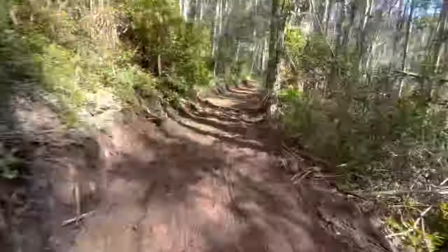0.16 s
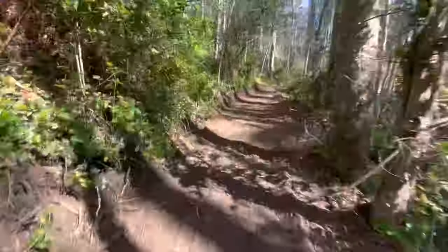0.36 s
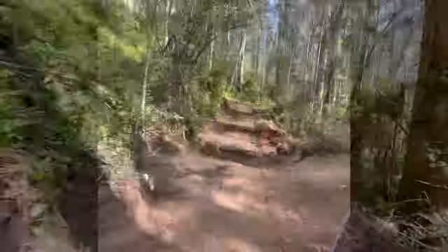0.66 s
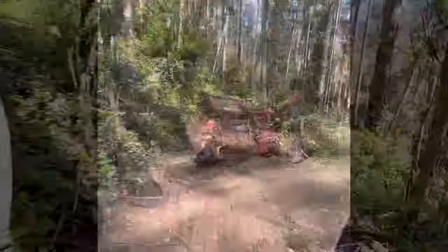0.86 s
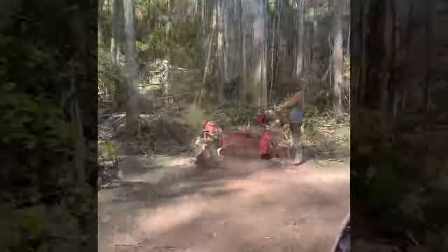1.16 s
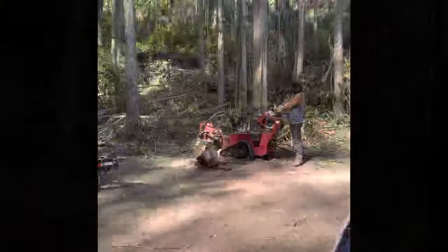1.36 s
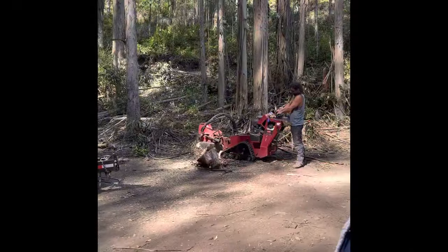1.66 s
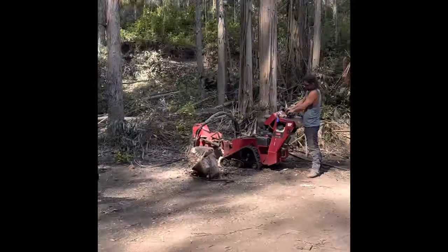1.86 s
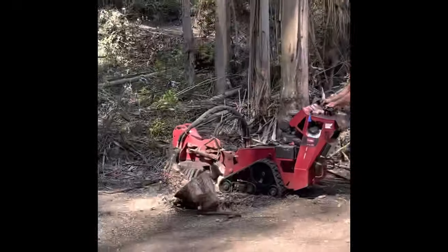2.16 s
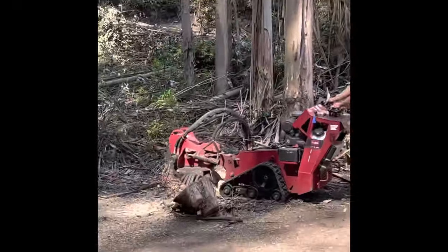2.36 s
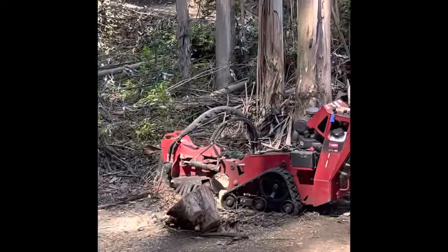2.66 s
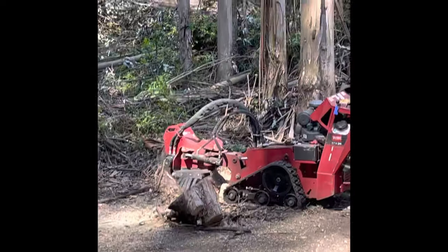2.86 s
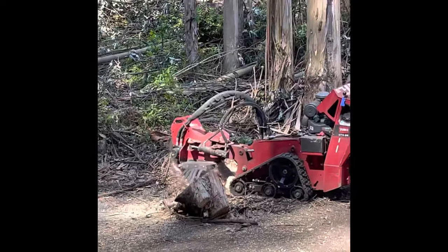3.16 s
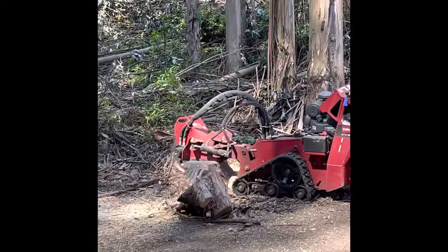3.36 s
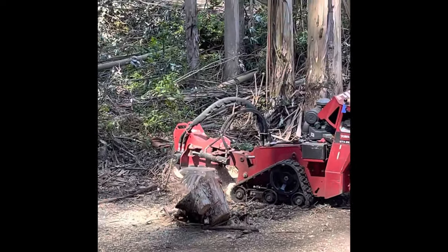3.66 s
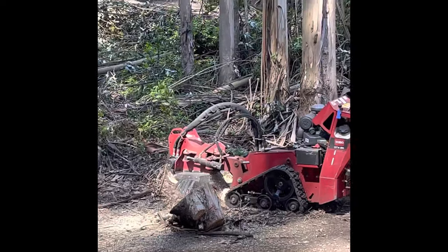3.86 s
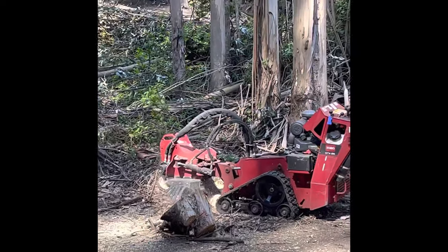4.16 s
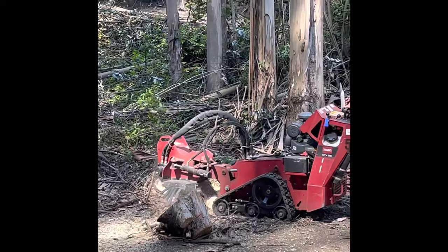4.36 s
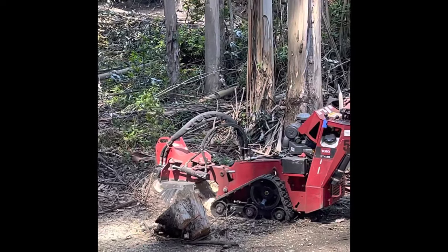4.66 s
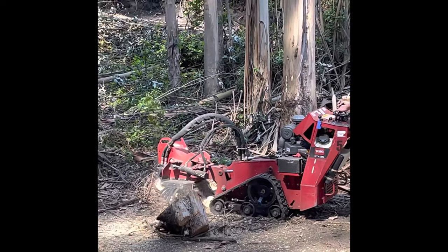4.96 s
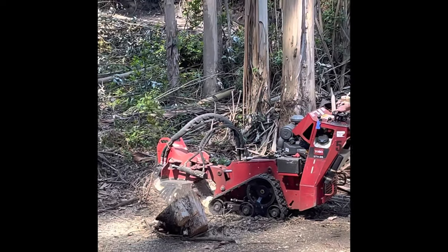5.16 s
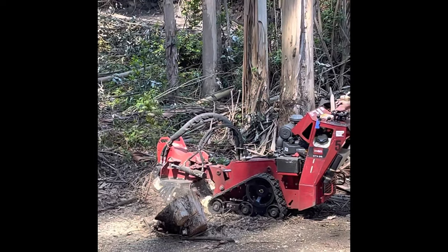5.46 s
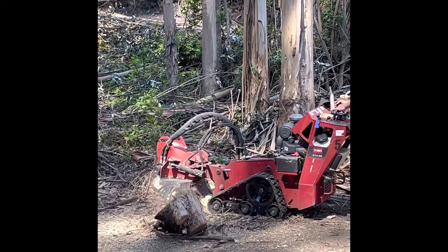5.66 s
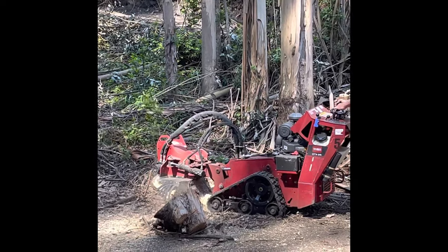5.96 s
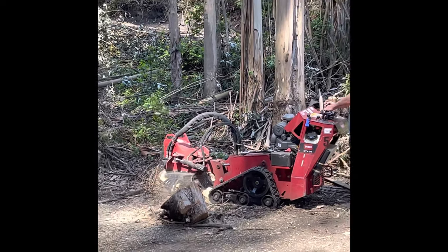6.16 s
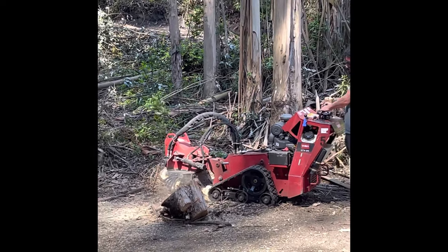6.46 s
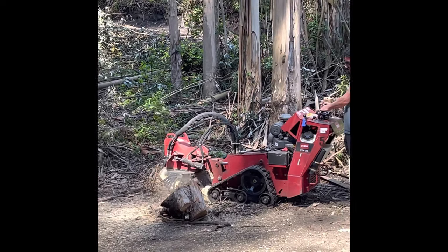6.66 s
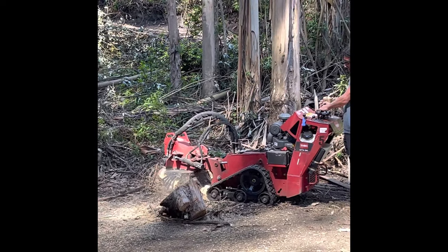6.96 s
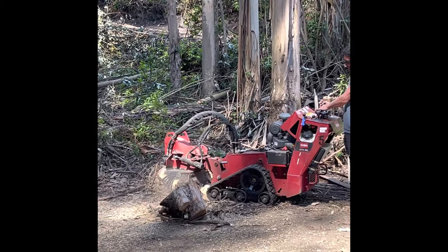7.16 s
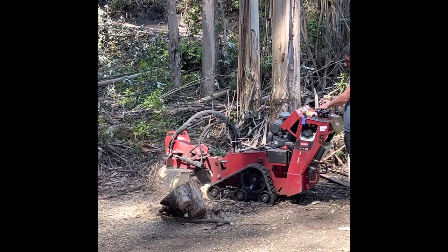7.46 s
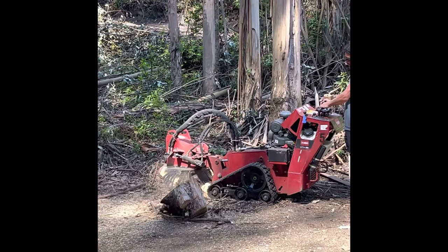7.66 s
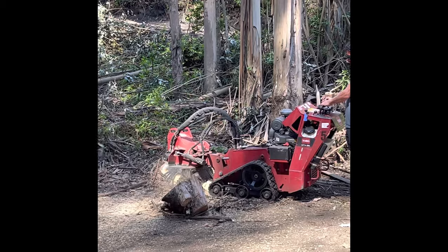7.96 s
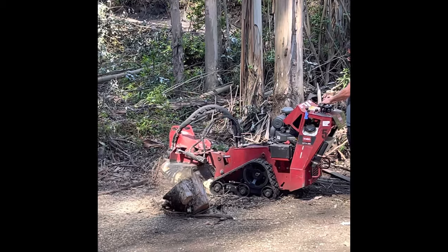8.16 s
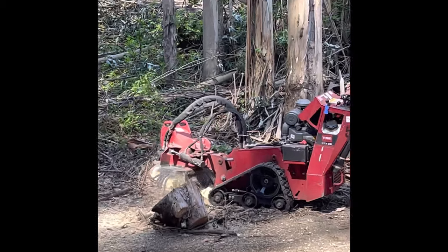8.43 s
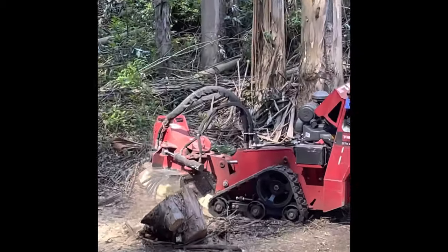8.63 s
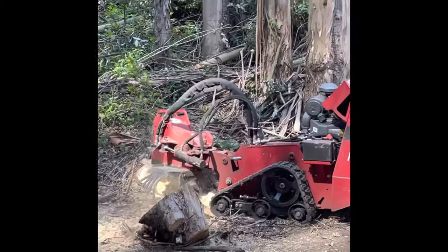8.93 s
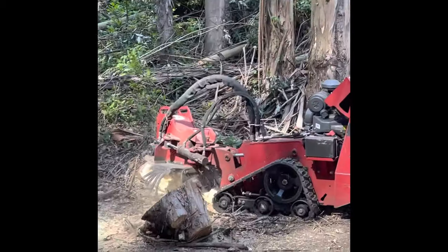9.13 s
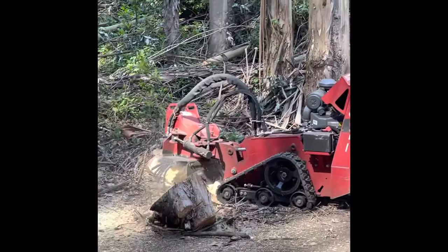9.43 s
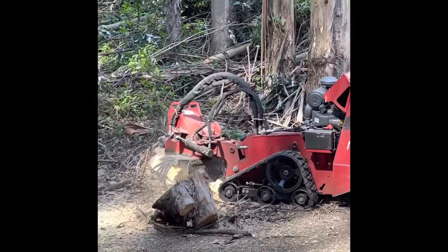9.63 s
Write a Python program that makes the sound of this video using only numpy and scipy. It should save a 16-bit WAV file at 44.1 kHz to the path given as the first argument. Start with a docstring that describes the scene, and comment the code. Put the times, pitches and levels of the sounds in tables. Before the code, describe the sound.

A petrol stump grinder fades in from about 0.4 to 1.5 seconds, a few metres from a phone in a forest with a short, dull echo. Its engine runs fast and rises slightly, with a booming exhaust, valve clatter, buzzing panels and a pump whine. At about 2.7 seconds the cutting wheel meets the stump and rapid, rough grinding begins. The deepest bite comes between 3 and 3.5 seconds, with heavy knocks, thuds and tearing fibres; the engine drops in pitch and the whine dies away. Grinding continues with a low woody groan, hollow ringing, a steely ring and irregular hard knocks, while the engine wavers, dipping noticeably near 6.9 and 8.6 seconds. From about 8.3 to 9.5 seconds the bites come thick and sharp, with cracking chips and metallic clangs. The machine is still grinding at the end, near 10 seconds.

```python
"""Stump grinder on a forest road

A two-cylinder petrol engine booms, clatters and whines a few metres from a phone; the sound fades in.
One crankshaft drives the exhaust, valves, pump and cutter wheel, so they all slow as the wheel digs in.
The wheel's teeth knock on the stump, tear its fibres and now and then bite hard."""
import sys
import numpy as np
from scipy import signal
from scipy.fft import rfft, irfft, next_fast_len
from scipy.io import wavfile
from scipy.ndimage import uniform_filter1d

SR = 44100
rng = np.random.default_rng(int(sys.argv[2]) if len(sys.argv) > 2 else 0)


def to_wav(sig):
    """Store sig (one row per channel, or 1-D mono) as 16-bit WAV at the path in sys.argv[1].

    Samples outside -1..1 are clipped; the rate is SR.
    """
    pcm = np.clip(np.atleast_2d(sig), -1, 1) * 32767
    pcm = np.round(pcm).astype(np.int16)
    wavfile.write(sys.argv[1], SR, pcm.T)  # frames by channels


N = 431738
T = np.arange(N) / SR

# the exhaust's main note, five times the engine's cycle rate: (time [s], pitch [Hz])
ENGINE_NOTE = [(.52, 142), (.75, 139), (1.0, 141.6), (1.13, 142.1), (1.42, 145.2), (2.8, 145),
               (3.42, 135.2), (4.13, 134.5), (4.32, 136.4), (4.55, 134.9), (4.72, 135.9), (4.88, 133.9),
               (5.06, 135.4), (5.63, 134), (5.8, 135.9), (6.05, 136.3), (6.53, 134.3), (6.72, 136.7),
               (6.88, 131.2), (7.25, 134), (7.5, 137.1), (7.76, 133.5), (8.0, 136.5), (8.22, 134.9),
               (8.47, 137.3), (8.59, 132.4), (8.72, 132.6), (8.87, 136.5), (9.15, 134.5), (9.37, 136.7),
               (9.6, 133.8)]
# exhaust tones, running free and working hard: (multiple of the cycle rate, relative level [dB])
FREE_TONES = [(1, -34), (2, -2.5), (3, -4.5), (4, -19), (5, 3.5), (6, -4.5), (7, -9.5), (8, -14.5),
              (9, -15), (10, -16.5), (11, -27)]
LOADED_TONES = [(1, -40), (2, -5.5), (3, -16), (4, -21.5), (5, -0.5), (6, -9), (7, -23), (8, -12),
                (9, -15.5), (10, -55), (11, -36)]
# noise of valves, fan and exhaust gas: (frequency [Hz], relative level [dB])
CLATTER_SPECTRUM = [(25, -13), (100, -0.5), (260, -1.5), (400, -6), (640, -0.5), (800, -4), (1100, -1.5),
                    (1350, -1.5), (1680, -7), (2000, 0.5), (2150, -6.5), (2340, -4.5), (2700, -9.5),
                    (5000, -14.5), (14000, -21.5)]
# buzz of the engine panels: (multiple of the cycle rate, relative level [dB])
PANEL_TONES = [(13, 0), (16, 4), (22, -2), (26, 4.5), (36, 0.5), (38, 0), (39, -9), (42, 4), (44, 0),
               (45, 2), (46, 4), (48, 1.5), (50, -1), (54, -3), (60, 3), (66, -6), (71, 0), (79, -3),
               (81, 3)]
# even tones of the pump's whine: (multiple of the pump's base pitch, relative level [dB])
PUMP_TONES = [(2, 3), (4, -4), (8, -11)]
# depth of the cut, deepest on the first plunge: (time [s], level against steady grinding [dB])
CUT_DEPTH = [(2.88, -4.5), (3.08, -3), (3.4, 5.5), (3.58, 1), (4.6, 1.7), (6.35, 0), (6.85, 4), (7.3, -2),
             (8.3, -2), (9.75, -1)]
# how hard the teeth drive the stump's groan, its hollow ring and the steel: (time [s], level [dB])
GROAN_DRIVE = [(2.9, -32.5), (3.15, -28), (3.26, -26), (3.42, -29), (3.5, -33), (3.73, -34), (3.86, -27),
               (4.3, -28.5), (5.3, -28.5), (6.4, -31.5), (7.2, -31), (8.05, -34.5), (8.55, -32.5),
               (9.75, -34)]
HOLLOW_DRIVE = [(3.1, -37), (3.7, -39.5), (4.9, -31.5), (6.0, -36.5), (7.4, -34.5), (7.6, -30), (8.15, -31),
                (8.6, -39), (9.75, -39)]
STEEL_DRIVE = [(3.0, -40), (4.3, -31), (5.5, -28), (6.0, -29.5), (6.15, -33), (6.32, -27), (6.55, -31),
               (6.7, -28.5), (7.1, -29), (7.9, -32.5), (8.4, -33.5), (9.75, -37)]
# the stump's lowest resonance, then its higher ones: (frequency [Hz], width [Hz], boost [dB])
LOW_RESONANCE = [(351.3, 33, 11.5)]
STUMP_RESONANCES = [(571, 50, 11), (640.3, 48, 8.5), (1041, 94, 8.5), (1124, 66, 9), (1320, 55, 9.5)]
# tone colour of each sound of the cut: (frequency [Hz], relative level [dB])
GROAN_SPECTRUM = [(100, -46.5), (280, -6.5), (350, -0.5), (400, -1), (470, -16), (600, -12), (680, -10.5),
                  (800, -25), (1500, -55)]  # the whole stump shaking
WOOD_SPECTRUM = [(70, -22.5), (150, -2.5), (240, 4.5), (450, -5), (700, -1.5), (850, -6), (1300, -11),
                 (1600, -5.5), (2000, -11), (2400, -10.5), (3000, -14), (4500, -16), (8000, -21),
                 (14000, -50)]  # teeth against wood
HOLLOW_SPECTRUM = [(600, -43), (940, -17), (1040, 2.5), (1130, -2), (1220, -10), (1700, -38)]  # the stump's upper ring
STEEL_SPECTRUM = [(500, -40), (1600, -15.5), (1830, -7), (1980, -1), (2100, -8.5), (2400, -11.5),
                  (5000, -39)]  # wheel and guard
SPLINTER_SPECTRUM = [(500, -36), (2000, -13), (4000, -2), (6000, -2.5), (9000, -4.5), (14000, 2)]  # tearing fibres and flying chips
KNOCK_SPECTRUM = [(100, -13), (250, 1.5), (450, 3), (750, 0.5), (1150, -4.5), (1500, -4), (2200, -7),
                  (4500, -14.5), (14000, -53)]  # the stump under a hard bite
CRACK_SPECTRUM = [(300, -17), (1300, -3), (2200, 5.5), (4000, -3.5), (7000, -8), (14000, -56)]  # a chip breaking off
# hard bites of a tooth, with the strength of each part:
# (time [s], knock [dB], shove [dB], clang [dB], crack [dB], splinter [dB])
HARD_BITES = [(2.828, -19, -28, -40, -24, -28), (2.887, -21, -23, -40, -34, -38),
              (2.998, -23, -36, -36, -36, -29), (3.033, -16.5, -36, -36, -32, -32),
              (3.066, -16, -30, -28, -30, -31), (3.098, -24, -32, -38, -36, -30),
              (3.115, -17, -32, -40, -38, -34), (3.133, -19, -18, -40, -34, -29),
              (3.164, -20, -28, -36, -32, -26), (3.2, -15, -12, -34, -33, -26),
              (3.232, -27, -12.5, -30, -32, -18.5), (3.267, -17, -11.5, -34, -35, -22),
              (3.3, -24, -29, -36, -34, -25), (3.318, -33, -34, -34, -38, -20),
              (3.336, -16, -17, -31, -34, -29), (3.37, -15, -11, -19, -28, -21),
              (3.405, -12.5, -15, -18, -24, -23), (3.445, -21, -32, -32, -34, -36),
              (3.46, -30, -38, -36, -34, -20), (3.507, -22, -23, -27, -34, -22),
              (3.546, -22, -22, -30, -34, -30), (3.599, -32, -34, -36, -36, -21.5),
              (3.614, -20, -20, -36, -32, -32), (3.647, -19, -30, -34, -30, -26),
              (3.68, -35, -36, -34, -36, -23), (3.822, -22, -23, -36, -32, -28),
              (3.946, -44, -34, -36, -36, -19), (4.135, -24, -23, -34, -32, -41),
              (4.267, -26, -16, -38, -35, -38), (4.346, -19, -21, -27, -32, -38),
              (4.499, -35, -40, -38, -36, -24), (4.58, -25, -18.5, -34, -36, -34),
              (4.653, -15, -17, -32, -32, -26), (5.003, -16, -29, -32, -25, -24),
              (5.04, -28, -14.5, -34, -34, -38), (5.281, -24, -21, -32, -34, -23),
              (5.349, -21, -20, -37, -34, -25), (5.46, -26, -19, -26, -34, -32),
              (5.746, -34, -16, -37, -38, -34), (5.837, -34, -39, -38, -36, -28),
              (5.88, -25, -31, -34, -34, -38), (6.115, -32, -31, -38, -36, -27),
              (6.195, -20, -25, -36, -30, -32), (6.315, -37, -32, -21, -34, -27),
              (6.348, -22, -18, -27, -34, -33), (6.394, -25, -22, -32, -34, -31),
              (6.532, -35, -37, -23, -36, -37), (6.657, -24, -36, -28, -28, -23),
              (6.755, -17.5, -26, -40, -38, -36), (6.785, -20, -20, -36, -32, -34),
              (6.815, -29, -30, -27, -32, -23), (6.957, -16.5, -28, -31, -30, -20),
              (7.064, -28, -45, -26, -28, -29), (7.085, -22, -37, -36, -37, -36),
              (7.488, -20, -27, -37, -32, -39), (7.52, -15.5, -28, -29, -31, -30),
              (7.655, -21, -32, -34, -32, -34), (7.722, -20, -32, -40, -32, -34),
              (7.938, -21, -30, -34, -32, -36), (8.114, -18, -40, -40, -34, -39),
              (8.346, -19, -37, -15, -22, -26), (8.383, -13, -30, -25, -17, -33),
              (8.419, -17, -27, -16, -18, -24), (8.489, -31, -34, -28, -26, -37),
              (8.526, -9, -21, -23, -16, -27), (8.557, -25, -25, -32, -30, -38),
              (8.631, -32, -36, -22, -28, -37), (8.67, -13, -23, -23, -16, -32),
              (8.772, -30, -26, -22, -23, -33), (8.877, -31, -24, -24, -19, -34),
              (8.915, -15, -25, -29, -21, -26), (8.963, -28, -31, -36, -30, -38),
              (8.988, -18.5, -31, -35, -32, -24), (9.022, -23, -34, -30, -27, -36),
              (9.088, -32, -32, -24, -30, -26), (9.123, -26, -27, -22, -27, -24),
              (9.192, -28, -34, -28, -23, -32), (9.226, -13, -35, -36, -22, -31),
              (9.327, -37, -33, -28, -24, -27), (9.365, -27, -32, -21, -26, -27),
              (9.47, -15, -24, -28, -21, -30), (9.535, -24, -23, -34, -30, -36),
              (9.572, -28, -26, -34, -36, -31)]
# tone colour of the phone's two microphone openings: (frequency [Hz], gain [dB])
MIC_COLOUR = [(7000, 0.5), (9300, 1), (10200, 8.5), (11000, 7), (12000, -3.5), (13200, -15.5), (14200, -30)]
# how far the left side runs ahead of the right: (frequency [Hz], phase [rad])
MIC_PHASE = [(0, 0), (200, 0), (430, .55), (580, -.05), (830, .35), (1290, -.45), (1600, 0), (2600, .65),
             (4130, .75), (4600, 1.7), (5150, 4.9), (5650, 6.28), (6100, 6.4), (9050, 9.42), (11600, 11.7),
             (11900, 12.57)]
# how much louder the left side is: (frequency [Hz], left minus right [dB])
MIC_BALANCE = [(200, 0), (370, 4), (600, 5), (1200, 6.5), (1650, -0.5), (14000, 3)]

RUN_UP_S, RUN_UP_LENGTH_S, RUN_UP_DB = 1.0, 0.61, 1  # clatter and buzz grow as the engine speeds up
BUZZ_DB, BUZZ_FADE_DB = -33.5, 9.5  # panels running free, and their drop under load
WHINE_DB, WHINE_RISE_DB, WHINE_RISE_S, WHINE_RISE_LENGTH_S = -28.3, 8, 0.72, .28
HOUSING_DB, HOUSING_LOAD_DB, HOUSING_HZ, HOUSING_WIDTH_HZ = -35, 6.5, 833, 30  # the pump's casing
CONTACT_S, SINK_S = 2.68, 0.18  # the wheel meets the stump and sinks in
LOAD_S, LOAD_RISE_S = 2.85, 0.53  # the engine then starts to work hard
NIBBLES_PER_S, NIBBLE_DB = 2, (-27, -33, -32, -41, -23)  # small random bites, parts as in HARD_BITES


def undb(db):
    """Turn decibels into a factor to multiply by."""
    return 10 ** (np.asarray(db) / 20)


def unit(x):
    """Scale a signal to an average power of 1."""
    return x / np.sqrt(np.mean(x ** 2))


def curve(table, at=T):
    """Join the points of a table with straight lines."""
    return np.interp(at, *np.transpose(table))


def ramp(start_s, length_s):
    """Rise in a straight line from 0 to 1."""
    return np.clip((T - start_s) / length_s, 0, 1)


def wander(per_s):
    """Drift smoothly at random, by about 1 either way."""
    hold = max(int(SR / per_s), 1)
    steps = np.repeat(rng.standard_normal(N // hold + 1), hold)
    return unit(uniform_filter1d(uniform_filter1d(steps, hold), hold)[:N])


def colour(x, spectrum, resonances=()):
    """Filter a sound through a spectrum and its resonances; white noise keeps its power."""
    size = 8192
    f = np.fft.rfftfreq(size, 1 / SR)
    hz, db = np.transpose(spectrum)
    shape_db = np.interp(np.log(f + 1), np.log(hz), db)
    for centre, width, boost in resonances:
        shape_db += 10 * np.log10(1 + (undb(boost) ** 2 - 1) / (1 + (2 * (f - centre) / width) ** 2) ** 2)
    # build the filter so that it rings only after a hit, never before
    cepstrum = irfft(np.log(undb(shape_db)))[:size // 2]
    response = irfft(np.exp(2 * rfft(cepstrum, size)))
    return signal.oaconvolve(x, response / np.linalg.norm(response))[:N]


def hum(turns, tones):
    """Add up pure tones at whole multiples of a turning rate."""
    return unit(sum(undb(db) * np.sin(2 * np.pi * round(k) * turns) for k, db in tones))


def exhaust(cycles, tones, flutter=0.011):
    """Two cylinders fire unevenly, 0.36 of a cycle apart; the muffler delays the higher tones."""
    cycle, wave = np.linspace(0, 1, 1024), 0
    for k, (_, db) in enumerate(tones, 1):
        firing = 1 + np.exp(-2j * np.pi * k * .36)
        muffler = 1 / (1 + 10j * (k / 7 - 7 / k))
        wave = wave + undb(db) * np.cos(2 * np.pi * k * cycle + np.angle(firing * muffler))
    return unit(np.interp(cycles % 1, cycle, wave) * (1 + flutter * wander(25)))


def clatter(cycles, rattle_db=-8.5, throb=0.11, flicker_db=1.0):
    """The valves rattle the same way on every cycle; the hiss of gas and fan swells once a cycle."""
    size = 1536
    rattle = np.interp(cycles % 1 * size, np.arange(size), rng.standard_normal(size))
    hiss = (1 + throb * np.cos(2 * np.pi * cycles)) * rng.standard_normal(N)
    noise = colour(hiss + undb(rattle_db) * unit(rattle), CLATTER_SPECTRUM)
    return unit(noise) * undb(flicker_db * wander(30))


def panels(cycles, waver_db=3.0):
    """The engine shakes its panels into a buzz; each tone wavers on its own."""
    return unit(sum(undb(db + waver_db * wander(7.6)) * hum(cycles, [(k, 0)]) for k, db in PANEL_TONES))


def pump(cycles, cycle_hz, load, ratio=9.845, waver_db=1.0, fade_db=8.0):
    """The hydraulic pump whines in step with the engine; its even tones die away under load."""
    rise_db = WHINE_RISE_DB * (ramp(WHINE_RISE_S, WHINE_RISE_LENGTH_S) - 1)
    whine = undb(WHINE_DB + rise_db - fade_db * load) * np.sqrt(1 - load)
    # the third tone sings only near the pitch at which the housing rings
    off_pitch = 2 * (3 * ratio * cycle_hz - HOUSING_HZ) / HOUSING_WIDTH_HZ
    housing = undb(HOUSING_DB + HOUSING_LOAD_DB * load) / (1 + off_pitch ** 2) ** 2
    tone = whine * hum(ratio * cycles, PUMP_TONES) + housing * hum(ratio * cycles, [(3, 0)])
    return tone * undb(waver_db * wander(18))


def forest(x, echo_db=-13.0, side_db=-20, decay_s=1.0):
    """Tree trunks scatter a short, dull echo, different on each side."""
    age = np.arange(SR // 2) / SR
    tails = rng.standard_normal((2, len(age))) * undb(-60 * age / decay_s) * (age > .012)
    tails = signal.sosfilt(signal.butter(1, 5000, fs=SR, output="sos"), tails)
    middle, side = (signal.oaconvolve(x, tail / np.linalg.norm(tail))[:N] for tail in tails)
    side = signal.sosfilt(signal.butter(2, [650, 8000], "band", fs=SR, output="sos"), side)
    return x + undb(echo_db) * middle + undb(side_db) * side * np.array([[1], [-1]])


def grinding(level_db, patchy_db, growth=0):
    """A cutting sound starts on contact, varies with the grain and follows depth by `growth` dB per dB."""
    grain_db = patchy_db * np.tanh(wander(14))
    return ramp(CONTACT_S, SINK_S) * undb(level_db + growth * curve(CUT_DEPTH) + grain_db)


def strikes(wheel, sharpness, uneven_db, scatter_db, floor):
    """The lead teeth hit twice a turn, one harder than the other, never quite the same way."""
    count = (2 * wheel).astype(int)
    scatter = undb(scatter_db * rng.uniform(-0.85, 1, count[-1] + 1))
    strength = scatter[count] * undb(uneven_db * (-1.) ** count)
    pulses = strength * np.exp(-sharpness * (2 * wheel % 1))
    return unit(floor + uniform_filter1d(pulses, size=130))  # a tooth takes about 3 ms to sink in


def grains(per_s, spread_db):
    """Tiny breaks of unequal size run together into a crackle."""
    hits = rng.random(N) < per_s / SR
    signs = rng.choice([-1., 1.], N)
    return unit(hits * signs * undb(spread_db * np.minimum(rng.exponential(size=N), 4)))


def groan(rubbing, shove):
    """The teeth keep the whole stump ringing; a heavy shove makes it thud."""
    return colour(grains(1200, 1.4) * rubbing + shove, GROAN_SPECTRUM, LOW_RESONANCE)


def bites(rock_s=0.00593):
    """A biting tooth taps and clangs at once; the wood knocks, cracks and splinters; the stump rocks."""
    age = np.arange(SR // 10) / SR
    burst = lambda rise_s, fall_s: (1 - np.exp(-age / rise_s)) * np.exp(-age / fall_s)
    tap = np.exp(-age / .00015)
    knock = burst(rise_s=0.0027, fall_s=0.018)
    crack = burst(rise_s=0.0015, fall_s=0.0089)
    shove = (age > rock_s) * np.exp(-abs(age - rock_s) / 0.0016)
    clang = np.exp(-age / 0.0064)
    splinter = burst(rise_s=.0005, fall_s=0.0042)
    shapes = np.array([tap, knock, crack, shove, clang, splinter])
    times = CONTACT_S + np.cumsum(rng.uniform(0, 2, 60)) / NIBBLES_PER_S
    nibbles = [(s, *NIBBLE_DB) for s in times[times < T[-1]]]
    forces = np.zeros((len(shapes), N))
    for s, knock_db, shove_db, clang_db, crack_db, splinter_db in HARD_BITES + nibbles:
        start = int(s * SR)
        gains = undb([knock_db, knock_db, crack_db, shove_db, clang_db, splinter_db])
        forces[:, start:start + len(age)] += (gains[:, None] * shapes)[:, :N - start]
    return forces


def cutter(cycles, turns_per_cycle=1.061, tap_db=-1.0, snap_db=8.5):
    """The belt-driven wheel chips at the stump: wood knocks, steel rings and fibres tear."""
    wheel = cycles * turns_per_cycle
    groan_gain = grinding(curve(GROAN_DRIVE), patchy_db=3.0)
    wood_gain = grinding(level_db=-25.0, patchy_db=1.0, growth=0.37)
    hollow_gain = grinding(curve(HOLLOW_DRIVE), patchy_db=0.5)
    steel_gain = grinding(curve(STEEL_DRIVE), patchy_db=2.0, growth=0.13)
    fibre_gain = grinding(level_db=-32.0, patchy_db=2.0, growth=0.72)
    tap, knock, crack, shove, clang, splinter = bites()
    blows = strikes(wheel, sharpness=1.8, uneven_db=2., scatter_db=3.5, floor=0.48)
    ringing = strikes(wheel, sharpness=2.2, uneven_db=4.5, scatter_db=3.0, floor=0.48) * steel_gain
    tearing = strikes(wheel, sharpness=1.8, uneven_db=3.0, scatter_db=6.0, floor=0.3) * fibre_gain
    # these forces shape crackles, which take on the tone colour of whatever is hit
    wood = colour(grains(9000, 2.1) * blows * wood_gain, WOOD_SPECTRUM, STUMP_RESONANCES)
    hollow = colour(grains(5000, 1.1) * blows * hollow_gain, HOLLOW_SPECTRUM)
    knocks = colour(grains(12000, 1.1) * knock + undb(tap_db) * tap, KNOCK_SPECTRUM, STUMP_RESONANCES)
    steel = colour(grains(2500, 1.1) * (ringing + clang), STEEL_SPECTRUM)
    snaps = grains(5000, 3.2) * tearing + grains(9000, 0.95) * undb(snap_db) * splinter
    fibres = colour(snaps, SPLINTER_SPECTRUM)
    chips = colour(grains(9000, 1.2) * crack, CRACK_SPECTRUM)
    return groan(blows * groan_gain, shove) + wood + hollow + knocks + steel + fibres + chips


def scene():
    """The engine runs up, droops in the wood, then wavers as the wheel catches and clears."""
    load = ramp(LOAD_S, LOAD_RISE_S)  # 0 running free, 1 working hard
    cycle_hz = curve(ENGINE_NOTE) / 5  # in one cycle each cylinder fires once
    wobble = (0.000604 + 0.000967 * load) * wander(14)
    cycles = np.cumsum(cycle_hz * (1 + wobble)) / SR
    free = exhaust(cycles, FREE_TONES)
    loaded = exhaust(cycles, LOADED_TONES, flutter=0.017)
    boom = undb(-16.0) * ((1 - load) * free + load * loaded)
    run_up = undb(RUN_UP_DB * (ramp(RUN_UP_S, RUN_UP_LENGTH_S) - 1))
    rattle = clatter(cycles) * run_up * undb(-24.7 - 2.43 * load)
    buzz = panels(cycles) * run_up * undb(BUZZ_DB - BUZZ_FADE_DB * load)
    return boom + buzz + pump(cycles, cycle_hz, load) + forest(rattle + cutter(cycles))


def record(dry):
    """The phone colours each side, rounds off peaks and cuts the highest treble; the sound fades in."""
    peak_limit, top_hz = .92, 14200
    size = next_fast_len(N)
    hz = np.fft.rfftfreq(size, 1 / SR)
    side = np.array([[.5], [-.5]])  # left, right
    gain = undb(curve(MIC_COLOUR, hz) + side * curve(MIC_BALANCE, hz))
    lead = np.exp(1j * side * curve(MIC_PHASE, hz))
    heard = irfft(rfft(dry, size) * gain * lead, size)[:, :N]
    rounded = heard / (1 + (heard / peak_limit) ** 8) ** (1 / 8)
    fade = np.sin(np.pi / 2 * ramp(start_s=.38, length_s=1.0)) ** 1.11
    return signal.sosfilt(signal.ellip(8, .2, 80, top_hz, fs=SR, output="sos"), rounded * fade)


dry = scene()
out = record(dry)
to_wav(out)
```